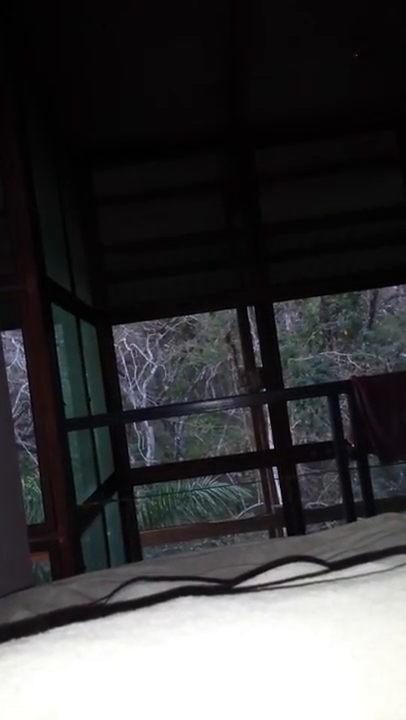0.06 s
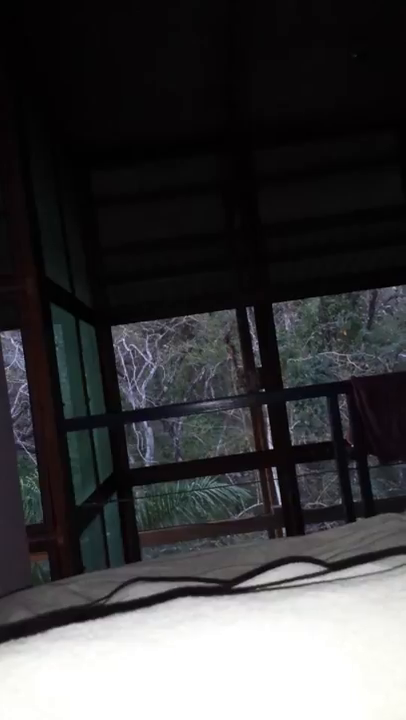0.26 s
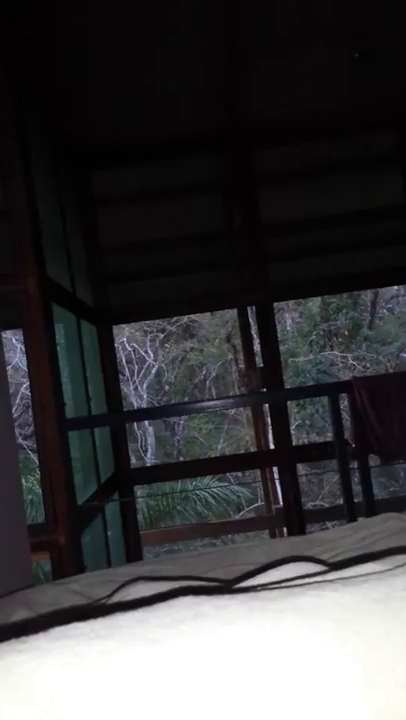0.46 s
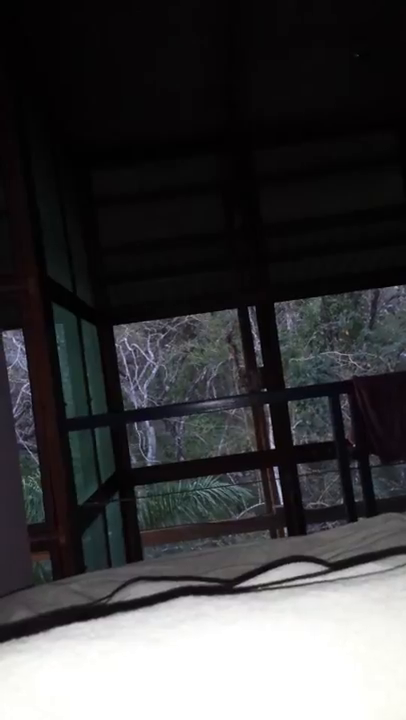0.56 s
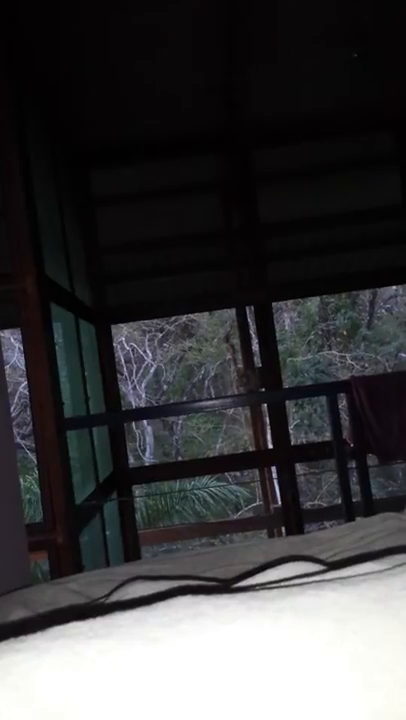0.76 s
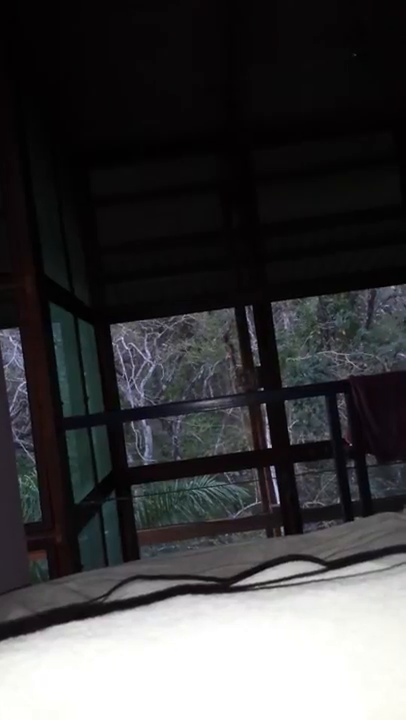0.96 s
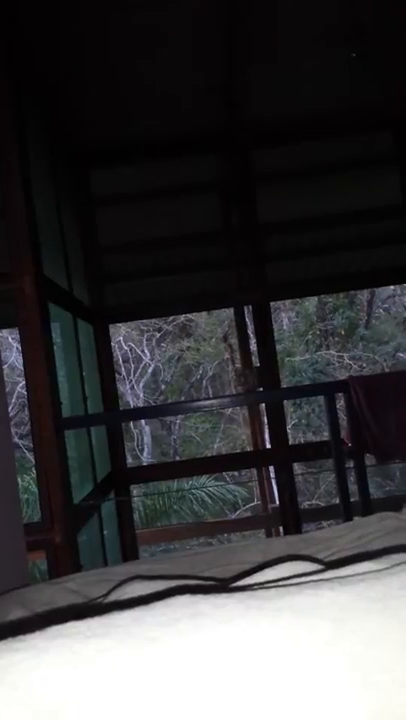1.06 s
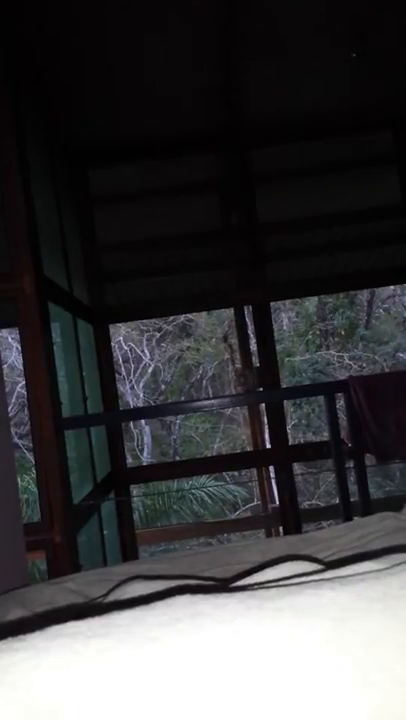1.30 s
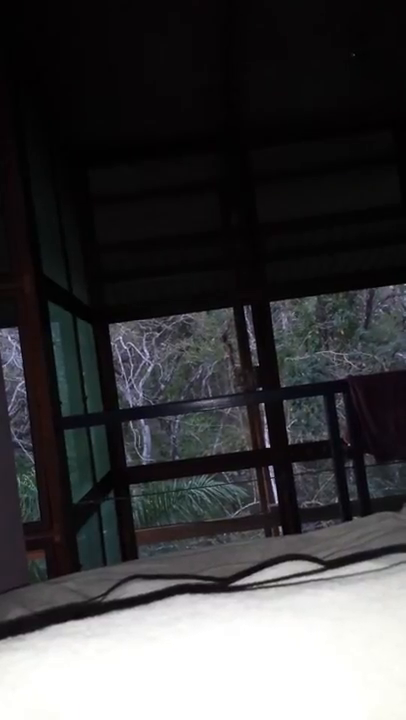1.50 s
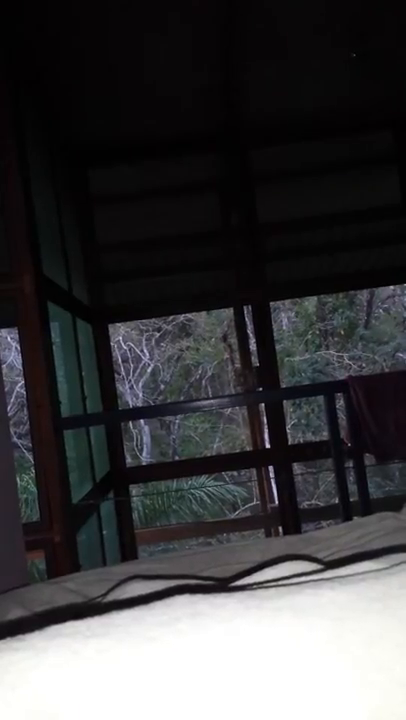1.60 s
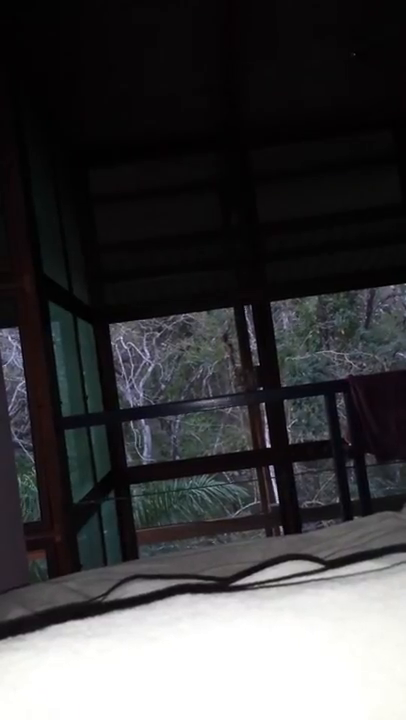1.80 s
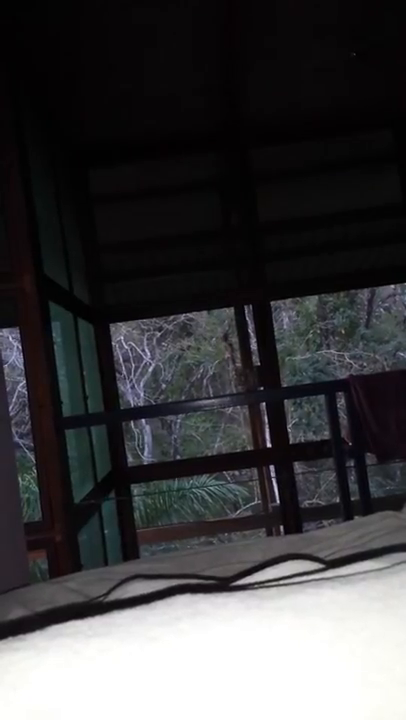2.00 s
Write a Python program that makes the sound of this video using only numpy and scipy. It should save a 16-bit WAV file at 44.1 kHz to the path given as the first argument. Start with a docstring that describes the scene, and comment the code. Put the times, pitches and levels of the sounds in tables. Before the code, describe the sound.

A howler monkey hoots and roars once, far off, as birds chirp over soft hiss.

```python
"""A forest, with a stereo microphone in an open wooden hut. A distant howler monkey gives one long call:
a clean hoot that flutters, breaks into a rough roar as puffs of breath ring its throat, and trails off.
One nearer bird chirps; others whistle, warble and chip among the trees, and a far one hoots softly.
The trees scatter every call. Underneath lie a low breeze, a drone and the hiss of leaves and insects."""
import sys
import numpy as np
from scipy import signal
from scipy.fft import rfft, irfft, next_fast_len
from scipy.io import wavfile
from scipy.ndimage import map_coordinates

SR = 44100
rng = np.random.default_rng(int(sys.argv[2]) if len(sys.argv) > 2 else 0)


def store_pcm(level_fs):
    """Save levels as 16-bit WAV."""
    pcm = np.round(np.clip(level_fs, -1, 1) * 32767).astype(np.int16)
    wavfile.write(sys.argv[1], SR, np.atleast_2d(pcm).T)


N = 90404
T = np.arange(N) / SR

# The monkey's hoot. Each row: time in seconds, pitch in Hz.
HOWL_PITCH = [(.16, 378), (.21, 364.3), (.33, 367), (.39, 397.3), (.43, 377), (.58, 373.3), (.635, 354),
              (.67, 375.4), (.735, 365.5), (.775, 406.8), (.84, 397.5)]
# Each row: time in seconds, level in dB.
HOWL_LEVEL = [(.14, -66), (.19, -49.5), (.212, -38.5), (.3, -28.5), (.415, -28), (.47, -33), (.5, -41),
              (.59, -35.5), (.66, -41.5), (.72, -35), (.8, -44.5), (.86, -62)]
# Each row: time in seconds, roughness from 0 to 1.
HOWL_ROUGHNESS = [(.2, 0.2), (.31, 0.22), (.365, 0.45), (.45, 0.37), (.505, .75), (.58, 0.35), (.66, 0.45),
                  (.73, .2), (.82, 0.56)]
# Throat resonances that colour the roar. Each row: centre in Hz, width in Hz, gain in dB.
THROAT_RESONANCES = [(588.4, 28.5, 1), (664.7, 96, 1.5), (737, 56, -6.5), (1000, 170, -31)]
# The rasp in those resonances. Each row: time in seconds, level in dB.
ROAR_LEVEL = [(.17, -70), (.2, -54), (.28, -46), (.365, -38.5), (.44, -41), (.51, -38), (.59, -47.5),
              (.7, -49), (.79, -57.5), (.85, -66)]
# The upper throat resonance opens with effort. Each row: time in seconds, centre in Hz, level in dB.
UPPER_THROAT = [(.22, 1290, -87), (.28, 1316, -60.5), (.34, 1350, -51.5), (.42, 1372, -59),
                (.52, 1370, -66), (.6, 1403, -71.5)]

# A thin high whistle. Each row: start in seconds, length in seconds, level in dB.
WHISTLE_NOTES = [(0.599, 0.272, -50), (1.746, .25, -51.5)]
# The nearer bird. Each row: time in seconds, pitch in Hz, level in dB.
CHIRP_CONTOUR = [(.15, 3150, -56), (.175, 3420, -56.5), (.19, 2850, -55), (.23, 2720, -57.5),
                 (.25, 3250, -50.5), (.266, 3680, -48.5), (.274, 4500, -67), (.286, 5050, -50),
                 (.296, 3600, -47.5), (.317, 2750, -56), (.33, 2650, -93)]
# Far birds. Each row: start and length in seconds, pitch, sweep and warble in Hz, relative level in dB.
FAR_NOTES = [(0.297, 0.18, 5470, 0.5, 343, -58), (0.302, .13, 3800, -200, 354, -61.5),
             (.33, 0.115, 2897, -100, 168, -58.5), (0.465, 0.056, 2690, -61, 91.3, -54.5),
             (0.551, .17, 2650, -150, 221.6, -65), (1.03, .2, 2787, -0.5, 126.2, -64),
             (1.151, 0.17, 4880, -300, 497, -59), (1.23, 0.078, 2600, 3.5, 132, -65.5),
             (1.236, 0.094, 3580, 0, 131, -60.5), (1.25, .16, 4397, -200, 141, -55),
             (1.417, 0.17, 4274, -2, 109, -68), (1.423, 0.033, 4890, -5, 96, -60.5),
             (1.608, 0.137, 2753, 80, 192.2, -63.5), (1.647, .1, 6860, -300, 186, -70.5),
             (1.789, 0.083, 2745, 99.5, 162.3, -64), (1.796, 0.093, 5030, -300, 203, -66.5),
             (1.981, 0.061, 6720, -200, 293, -63)]
# Tiny high chips. Each row: start and length in seconds, pitch in Hz, level in dB.
CHIP_NOTES = [(1.375, 0.021, 11550, -56), (1.858, 0.023, 9360, -62.5)]
# A far bird's hoots. Each row: start in seconds, length in seconds, level in dB.
HOOT_NOTES = [(0.068, 0.15, -61.5), (.25, 0.062, -57.5), (0.448, 0.27, -60.5), (0.638, 0.11, -66),
              (0.803, 0.15, -61.5), (1.011, 0.099, -60.5), (1.233, .12, -59.5), (1.383, 0.13, -61.5),
              (1.6, .11, -61), (1.792, 0.091, -60.5), (1.97, .1, -64)]

# Low moving air. Each row: frequency in Hz, relative spectral density in dB.
AIR_SPECTRUM = [(20, -48), (38, -16), (54, -11.5), (68, -23), (95, -12), (125, -7), (165, -11),
                (205, -19.5), (250, -15), (380, -15), (520, -20), (750, -24.5), (1000, -29), (1400, -31),
                (1800, -35.5), (3000, -41)]
# Each row: time in seconds, level of the air in dB.
BREEZE_LEVEL = [(0, -53), (.14, -54.5), (.55, -49), (.8, -49), (.95, -54.5), (1.1, -54.5), (1.32, -52),
                (1.6, -55.5), (1.78, -56), (1.93, -53), (2.05, -54.5)]
# The low drone. Each row: time in seconds, relative level in dB.
DRONE_LEVEL = [(0, -65), (.2, -50), (.7, -65), (.84, -47.5), (.92, -72), (1.17, -59), (1.25, -51),
               (1.41, -51.5), (1.5, -59), (2.05, -57)]
# Steady hiss, then rustling leaves. Each row: frequency in Hz, relative spectral density in dB.
HISS_SPECTRUM = [(900, -4), (1500, -14), (2000, -5), (2600, 1.5), (3400, -6), (5000, -6), (7000, -8.5),
                 (14500, -14.5)]
LEAF_SPECTRUM = [(900, -32), (1800, 0), (2600, 8), (5000, 4), (7500, -4.5), (14000, -15.5)]
# Each row: time in seconds, level of the leaves in dB.
RUSTLE_LEVEL = [(0, -61), (.24, -65.5), (.36, -55), (.54, -56.5), (.7, -59.5), (.84, -72.5), (.97, -67.5),
                (1.12, -64), (1.3, -61), (1.44, -60.5), (1.55, -85), (1.75, -98), (1.88, -61), (2.04, -98)]
# Faint ticks of twigs. Each row: start in seconds, level in dB.
TWIG_TICKS = [(1.443, -56), (1.594, -56), (1.862, -59)]

# Scatter among the trees. Each row: frequency in Hz, time to fall 60 dB in seconds.
FOREST_T60 = [(200, 0.45), (800, 0.32), (3000, 0.42), (6000, 0.43), (12000, 0.42)]
# Diffuse sound at the microphone. Each row: frequency in Hz, left-right correlation from 0 to 1.
STEREO_LIKENESS = [(60, 0.9), (150, 0.97), (370, 0.84), (920, 0), (2300, 0.03), (5720, 0.091), (14200, 0)]
# Balance at the microphone. Each row: frequency in Hz, left over right in dB.
LEFT_OVER_RIGHT = [(60, 0.1), (300, 4.5), (700, 3.5), (2000, 2.5), (5000, 3.5), (9000, -1.5), (14000, -0.5)]


def howler_monkey(flutter_hz=37, flutter_depth=.55, jitter=.04, overtone_db=-35, rasp_db=1):
    """Far off, a hoot flutters as it roughens; breath pulsing at its pitch rings chest and throat."""
    rough = np.clip(curve(HOWL_ROUGHNESS), 0, .98)
    phase = phase_of(curve(HOWL_PITCH) * (1 + jitter * rough * wobble(110.07)))
    flutter = np.sin(phase_of(flutter_hz * (1 + .12 * wobble(25.35))))
    puffs = lambda: rng.standard_normal(N) * (1 + np.cos(phase)) * (1 + .5 * flutter)
    chest = lambda hz: resonance(hz, centre=385, width=138)
    throat = lambda hz: sum(amp(db) * resonance(hz, c, w) for c, w, db in THROAT_RESONANCES)
    tone = np.sqrt(2) * (np.sin(phase) + amp(overtone_db) * np.sin(2 * phase))
    voiced = np.sqrt(1 - rough ** 2) * (1 + flutter_depth * rough * flutter) * tone
    rasp = amp(rasp_db) * rough * unit(filtered(puffs(), chest))
    hoot = amp(curve(HOWL_LEVEL)) * (voiced + rasp)
    roar = amp(curve(ROAR_LEVEL)) * unit(filtered(puffs(), throat))
    upper_tone = np.sin(phase_of(curve(UPPER_THROAT) + 45 * wobble(220)))
    upper = amp(curve(UPPER_THROAT, column=2)) * unit((1 + .54 * flutter) * upper_tone)
    call = (hoot + roar + upper) * gate(.18, .75, .018)
    return forest(call, wet_db=-10.5, left_lag_s=.00023)


def whistling_bird(pitch_hz=5438, rise_hz=55, waver_hz=24.47, tremble=.22):
    """Two thin whistles, left of centre, that swell, rise a little and fade."""
    notes = np.zeros(N)
    for start, length, db in WHISTLE_NOTES:
        along_note = progress(start, length)
        pitch = pitch_hz + rise_hz * along_note + waver_hz * wobble(300)
        notes += amp(db) * np.sin(np.pi * along_note) * np.sin(phase_of(pitch))
    notes *= np.sqrt(2) * (1 + tremble * wobble(60))
    return forest(notes, wet_db=-4.5, left_lag_s=.00005) * amp([[1], [-1]])


def chirping_bird():
    """Nearer the hut, one quick twisting phrase that lingers in the trees."""
    pitch = curve(CHIRP_CONTOUR) + 50 * wobble(300.7)
    note = amp(curve(CHIRP_CONTOUR, column=2)) * np.sin(phase_of(pitch))
    return forest(np.sqrt(2) * note * gate(.157, .21, .01), wet_db=4)


def far_birds():
    """Warbled notes, blurred by distance."""
    notes = np.zeros(N)
    for start, length, hz, sweep, warble, db in FAR_NOTES:
        pitch = hz + sweep * (progress(start, length) - .5) + warble * wobble(500)
        notes += amp(db) * gate(start, length, .088) * np.sin(phase_of(pitch))
    return forest(2 * notes, wet_db=-2, left_lag_s=.0001)


def chipping_bird(fall_hz=350):
    """Very high, short falling chips, to the right of the microphone."""
    notes = np.zeros(N)
    for start, length, hz, db in CHIP_NOTES:
        pitch = hz - fall_hz * (progress(start, length) - .5) + 90 * wobble(630)
        notes += amp(db) * gate(start, length, .011) * np.sin(phase_of(pitch))
    return forest(np.sqrt(2) * notes, wet_db=-3.5) * amp([[-3], [3]])


def hooting_bird(pitch_hz=839.6):
    """Far away, soft pure notes on one pitch, about five a second."""
    level = sum(amp(db) * gate(start, length, .066) for start, length, db in HOOT_NOTES)
    tone = np.sin(phase_of(pitch_hz + 3 * wobble(20)))
    return forest(np.sqrt(2) * level * tone, wet_db=-.5)


def background(drone_hz=115.9, insect_hz=5490, twig_t60_s=.043):
    """All round the hut: low air, a wavering drone, insect hiss, rustling leaves and ticking twigs."""
    waver = 1 + .32 * wobble(26.48)
    drone_tone = np.sin(phase_of(drone_hz + 4 * wobble(25)))
    drone = amp(curve(DRONE_LEVEL) - 2.5) * unit(waver * drone_tone)
    insects = amp(-74) * forest(np.sin(phase_of(insect_hz + 130 * wobble(600))), wet_db=-6)
    air = amp(curve(BREEZE_LEVEL)) * diffuse_noise(AIR_SPECTRUM)
    hiss = amp(-62.5) * diffuse_noise(HISS_SPECTRUM)
    twigs = sum(amp(db - 60 * np.abs(T - start) / twig_t60_s) * (T >= start) for start, db in TWIG_TICKS)
    foliage = (amp(curve(RUSTLE_LEVEL)) + twigs) * diffuse_noise(LEAF_SPECTRUM)
    return air + drone + insects + hiss + foliage


def forest(x, wet_db, left_lag_s=0):
    """Direct sound at the microphone plus scatter from the trees, at the same overall level."""
    hz, t, noise = signal.stft(rng.standard_normal((2, SR)), SR, nperseg=256)
    decay = amp(-60 * t / at_hz(FOREST_T60, hz)[:, None])
    tail = signal.istft(noise * decay, SR, nperseg=256)[1]
    scatter = unit(spread(signal.fftconvolve(x[None], tail, axes=1)[:, :N]))
    direct = filtered(unit(x), lambda hz: np.exp(1j * np.pi * hz * left_lag_s * np.array([[-1], [1]])))
    return x.std() * unit(direct + amp(wet_db) * scatter)


def spread(pair):
    """Two unrelated signals as a diffuse field: alike in the bass, unrelated in the treble."""
    angle = lambda hz: np.arccos(np.clip(at_hz(STEREO_LIKENESS, hz), -1, 1)) / 2
    mid, side = filtered(pair, lambda hz: np.array([np.cos(angle(hz)), np.sin(angle(hz))]))
    return np.array([mid + side, mid - side])


def diffuse_noise(spectrum):
    """Coloured noise from all sides, at rms 1."""
    return unit(spread(filtered(rng.standard_normal((2, N)), lambda hz: amp(at_hz(spectrum, hz)))))


def resonance(hz, centre, width):
    """Response of two like band-passes in series, all in Hz."""
    return (1j * hz * width / (centre ** 2 - hz ** 2 + 1j * hz * width)) ** 2


def amp(db):
    """Decibels to gain."""
    return 10 ** (np.asarray(db) / 20)


def unit(x):
    """Scaled to rms 1."""
    return x / np.sqrt(np.mean(x ** 2) + 1e-20)


def at_hz(rows, hz):
    """A frequency table read on a log axis."""
    freqs, values = np.transpose(rows)
    return np.interp(np.log(hz + 1), np.log(freqs + 1), values)


def curve(rows, column=1):
    """One column of a time table, per sample."""
    rows = np.asarray(rows)
    return np.interp(T, rows[:, 0], rows[:, column])


def wobble(rate):
    """A smooth random curve, rate knots a second."""
    return map_coordinates(rng.standard_normal(int(N * rate / SR) + 4), [T * rate])


def phase_of(hz):
    """Running phase of a pitch curve, in radians."""
    return 2 * np.pi * np.cumsum(hz) / SR


def progress(start, length):
    """A ramp from 0 to 1 across a note."""
    return np.clip((T - start) / length, 0, 1)


def gate(start, length, edge):
    """A note's envelope with soft edges, all in seconds."""
    inside = np.minimum(T - start, start + length - T)
    return np.sin(np.pi / 2 * np.clip(inside / edge + .5, 0, 1)) ** 2


def filtered(x, response):
    """x through a frequency response."""
    size = next_fast_len(N + SR // 2)
    return irfft(rfft(x, size) * response(np.fft.rfftfreq(size, 1 / SR)), size)[..., :N]


def scene():
    """The forest from the hut, a little louder on the left below the top treble."""
    mix = howler_monkey() + whistling_bird() + chirping_bird() + far_birds()
    mix += chipping_bird() + hooting_bird() + background()
    return filtered(mix, lambda hz: amp(at_hz(LEFT_OVER_RIGHT, hz) * np.array([[.5], [-.5]])))


def record(dry):
    """The microphone passes nothing above 14.6 kHz."""
    return filtered(dry, lambda hz: hz < 14600)


dry = scene()
out = record(dry)
store_pcm(out)
```